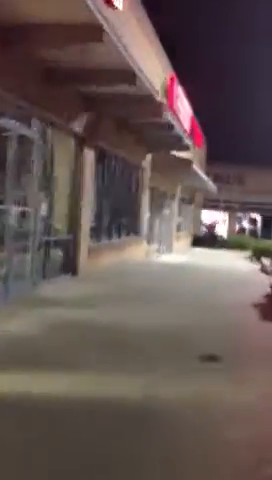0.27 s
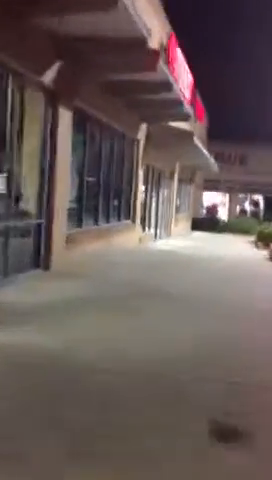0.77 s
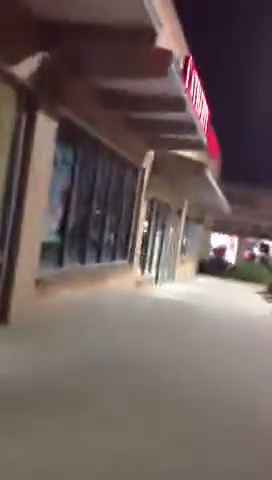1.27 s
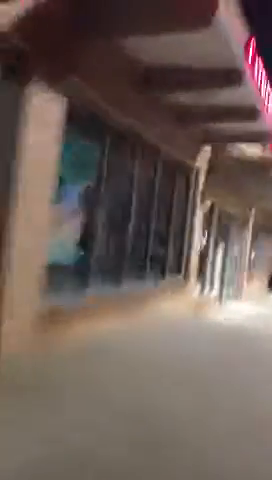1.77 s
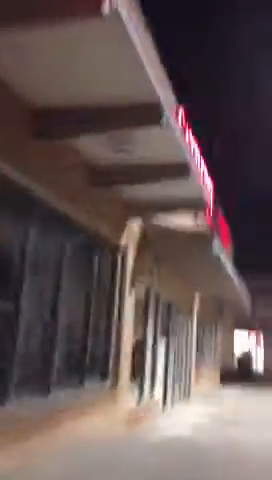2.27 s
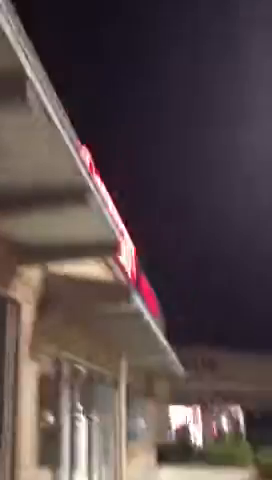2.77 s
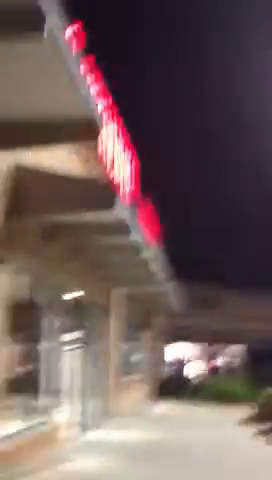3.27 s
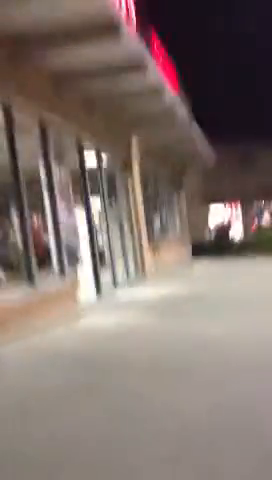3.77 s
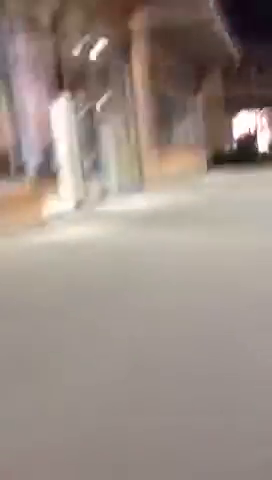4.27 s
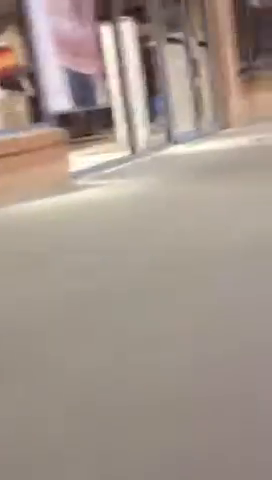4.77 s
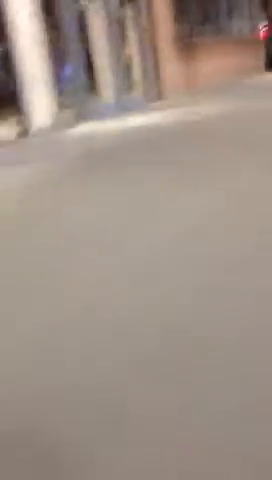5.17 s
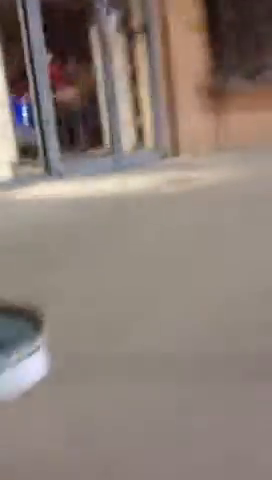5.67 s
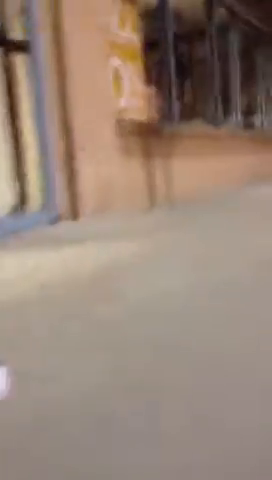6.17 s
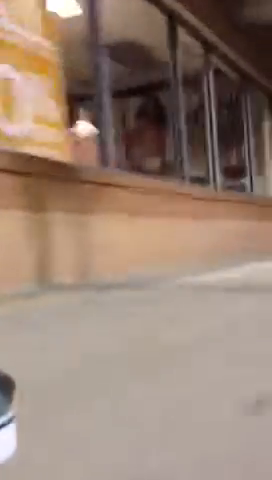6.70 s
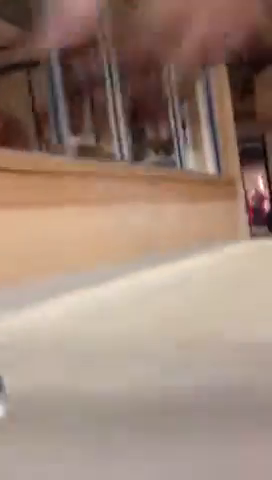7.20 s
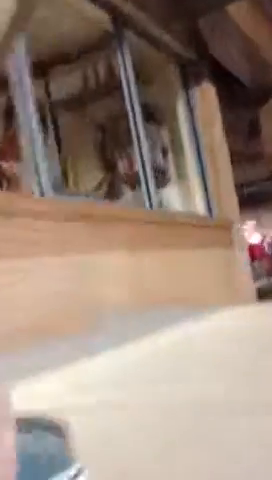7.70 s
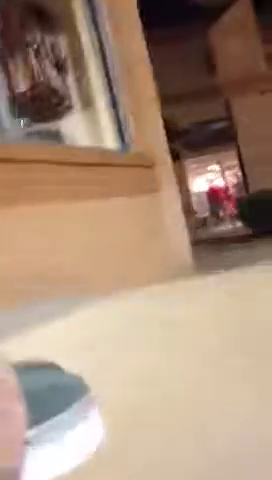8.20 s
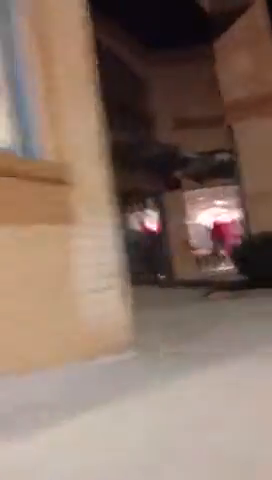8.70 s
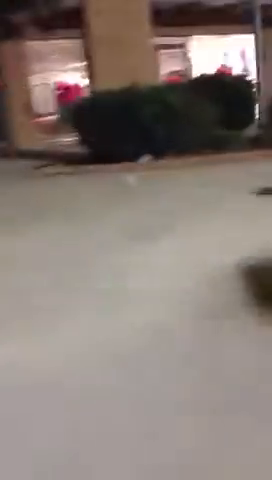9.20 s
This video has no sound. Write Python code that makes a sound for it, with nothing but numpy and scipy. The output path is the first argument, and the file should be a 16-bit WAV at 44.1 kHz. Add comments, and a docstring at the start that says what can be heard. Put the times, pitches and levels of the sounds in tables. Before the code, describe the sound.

A skateboard rolls over a concrete sidewalk for about nine and a half seconds, heard close from a microphone in the rider's hand. The wooden deck gives a continuous, resonant rumble. At each slab joint the front and rear wheels make a loud double clack, briefly echoed by an awning; the rumble dips after each and swells back. Pairs come at the start and around 0.5, 1.1, 1.7, 2.4 and 3.5 seconds, with small ticks of grit and a very faint swish near 2.5 seconds. From about 4 to 7 seconds the sound turns brighter, with rasping, hissing wheels and sharper clacks near 4.4, 5.1, 5.8 and 6.6 seconds. A grain cracks sharply around 4.5 seconds, and the rumble briefly eases. The hiss then recedes, and the duller roll continues with strong double clacks at about 7.3, 8.1 and 8.7 seconds.

```python
"""A skateboard rolls along a concrete sidewalk under a shop awning, heard from a phone in the rider's hand.
Rough slabs force the deck into a resonant rumble and make the wheels hiss. At each joint the front axle
clacks, then the rear, and the awning reverberates; grit cracks, and a faint swish passes as the phone
is lifted. Midway the rider crouches and for a while the microphone faces the wheels, so the sound
brightens. The phone's limiter ducks the rumble after each clack and lets it swell back."""
import sys
import numpy as np
from scipy import signal
from scipy.fft import rfft, irfft, next_fast_len
from scipy.io import wavfile
from scipy.ndimage import uniform_filter1d, minimum_filter1d, map_coordinates

SR = 44100
rng = np.random.default_rng(int(sys.argv[2]) if len(sys.argv) > 2 else 0)


def output_pcm(signal):
    """Save a mono or channel-first signal as 16-bit PCM at the path in sys.argv[1].

    Samples are clipped to [-1, 1] before scaling.
    """
    pcm = np.clip(np.atleast_2d(signal).T, -1, 1) * 32767
    wavfile.write(sys.argv[1], SR, np.round(pcm).astype(np.int16))


N = 416744

# Shaking of the board by the pavement, about its average [t/s, level/dB]
SHAKING = [(0.15, 1), (0.95, 1.5), (1.55, 3), (2.62, 4), (3.03, -3), (3.45, 0.5), (3.9, -1), (4.25, -3.5),
           (4.78, -8.5), (5.05, -2.5), (5.65, 1.5), (6.05, -1), (6.3, 3.5), (6.55, -0.8), (7.85, -1.5),
           (8.4, 0.5), (9.05, 2), (9.42, .5)]
# Aim: treble gained as the microphone turns to face the wheels [t/s, level/dB]
MIC_AIM = [(3.4, 2), (3.9, 9), (4.2, 14.5), (5.0, 17), (5.8, 19), (6.4, 17), (7.1, 8.5), (7.6, 1),
           (8.4, -0.5)]
# Coarse patches that make the deck sing [t/s, half length/s, hum gain/dB, body gain/dB]
COARSE_PATCHES = [(1.098, 0.037, 4, 5), (5.098, .08, 5, 3.5), (5.8, 0.039, 6, 0), (6.26, 0.022, 10.5, -2),
                  (6.553, .04, -1, 2), (9.416, .045, 11.5, -9)]
# Further modes of deck, trucks and wheels [f/Hz, bandwidth/Hz, level/dB]
BOARD_MODES = [(205.6, 24, -7.5), (768, 48, -12.5), (969, 46, -11), (1403, 50, -11.5), (1832, 38, -4.5),
               (2340, 130, -10.5), (2830, 150, -12), (4740, 240, -17)]
# Rolling spectra, low to high: three of the deck, three of the wheels [f/Hz, relative level/dB]
RUMBLE_SPECTRUM = [(25, -57), (60, -34.5), (100, -20), (135, -12), (170, -3.5), (210, -1), (270, -0.5),
                   (350, -1.5), (420, -8), (520, -21), (900, -70)]
BODY_SPECTRUM = [(200, -66), (400, -22), (480, -4.5), (560, -3.5), (650, -3), (700, -2.5), (770, -2),
                 (860, -6), (1000, -29), (1600, -71)]
GROWL_SPECTRUM = [(400, -74), (780, -11.5), (880, -2), (960, 1.5), (1020, -3), (1110, 0), (1260, -13.5),
                  (1800, -23), (3200, -77)]
RASP_SPECTRUM = [(600, -58), (1230, 0.5), (1390, 1.5), (1560, 0.5), (1780, -3), (2020, -8.5), (2350, -9.5),
                 (2900, -14), (3400, -17), (4100, -23.5), (5400, -43), (15000, -45)]
WHIRR_SPECTRUM = [(2000, -43), (3700, -8), (4300, -3.5), (4650, 0), (4900, -5.5), (5250, -12.5),
                  (6300, -12), (8000, -16), (10000, -21.5), (11500, -15), (13300, -13.5), (15300, -19.5)]
HISS_SPECTRUM = [(2500, -61), (5300, -4.5), (6300, 0), (8200, -1.5), (9200, -6), (10000, -11.5),
                 (13000, -11), (15300, -15)]
# Balance of the rolling sounds [standing level/dB, crouch gain/dB, dB per dB of shaking, dB per dB of aim]
RUMBLE_LEVELS = (-0.76, -0.5, 1.01, -0.012)
HUM_LEVELS = (-5, 5, 0.94, 0)
BODY_LEVELS = (0.26, 0.016, 0.82, 0.052)
GROWL_LEVELS = (-8, 7.5, 0.85, -0.07)
RASP_LEVELS = (-20, 5, 0.88, 0.5252)
WHIRR_LEVELS = (-36, 5.5, .7, 1.1459)
HISS_LEVELS = (-31.5, -7, 0.75, 1.0431)
# Joint crossings; a pair is front axle, rear axle [t/s pair, peak level/dB over CEILING pair,
# lag between left and right wheel/ms, bite into the edge/dB pair, clink f/Hz pair]
JOINT_CROSSINGS = [(0.0117, 0.122, 3.5, 4, 5, 2.5, -3, 1750, 1800),
                   (0.5373, 0.653, 2.5, 1, 4.6, 2.5, -4.5, 1810, 2360),
                   (1.1254, 1.2457, 3.5, 4.5, 3.35, -5, -1, 1270, 1280),
                   (1.7473, 1.8712, 7.5, 6.5, 3.4, 0, -4.5, 1610, 1390),
                   (2.3635, 2.4904, 6, 6, 3.45, 4.5, 2.5, 1550, 2300),
                   (3.502, 3.6412, 6.5, 8, 2.7, 0, -13, 1260, 1240),
                   (4.36, 4.514, -1, 4, 3.36, 3.5, 3, 1690, 1460),
                   (5.1361, 5.2582, 2.5, 10.5, 1.46, 15, 0, 2830, 4750),
                   (5.831, 5.9453, 7.5, 10.5, 3.8, 6, -0.5, 2820, 4360),
                   (6.602, 6.7282, 4.5, 4.5, 3.2, 9.5, 7, 1410, 3160),
                   (7.301, 7.428, 7.5, 6.5, 3.74, 12.5, 5.5, 1490, 2240),
                   (8.06, 8.19, 8, 7, 3.47, 3, 2.5, 1280, 1270),
                   (8.6917, 8.831, 10, 10.5, 8.7, 1, -2.5, 1430, 1240)]
# Spectra of a clack's parts and of the awning's echo [f/Hz, relative level/dB]
KNOCK_SPECTRUM = [(60, -55), (250, -9.5), (420, -10.5), (550, -0.5), (660, -2), (850, -2.5), (1050, -5),
                  (1300, -19.5), (2200, -34.5), (5000, -79), (16000, -94)]
THUMP_SPECTRUM = [(25, -38), (70, -27.5), (130, -12), (185, 0.5), (260, 1.5), (340, 1.5), (420, -11),
                  (520, -10.5), (1000, -81)]
CRACK_SPECTRUM = [(100, -44.5), (800, -1), (1350, 8), (1750, 2), (2100, -5.5), (2800, -6.5), (3300, -11),
                  (5000, -40.5), (16000, -71)]
SNAP_SPECTRUM = [(200, -49), (2400, 3), (3500, 1), (4500, 4), (5400, -15), (6300, -7), (8300, -11),
                 (10200, -24.5), (13300, -12), (15500, -13.5)]
ECHO_SPECTRUM = [(150, -24), (600, 11.5), (1800, 6.5), (3500, -9.5), (8000, -13.5), (10000, -23.5),
                 (15000, -23)]
# Reverberation time under the awning [f/Hz, T60/s]
AWNING_T60 = [(150, 0.17), (1000, 0.16), (4000, 0.18), (12000, 0.18)]
# Grains under a wheel [t/s, tick peak level/dB, f/Hz, thud peak level/dB]
GRAINS = [(1.5453, -32, 3800, -39), (1.553, -34, 1200, -13), (2.205, -26.5, 1900, -13),
          (2.31, -27.5, 1950, -20), (2.712, -23, 1780, -25), (2.927, -39, 1200, -19),
          (4.4585, -9, 6200, -24), (4.608, -28, 3900, -28), (4.845, -33, 1800, -28)]
# Spectrum of the swish of the lifted phone [f/Hz, relative level/dB]
SWISH_SPECTRUM = [(4000, -39), (7300, 0), (8300, 3), (9000, -3), (9800, -17), (15000, -28)]

BENDING_MODE, FLEX_MODE = (555.4, 26), (339.5, 45)  # main and lower deck mode [f/Hz, bandwidth/Hz]
CROUCH_S = (3.4, 6.26)  # the rider starts to crouch and is fully down
ROLL_DB, CEILING = -29, 0.7  # reference level of the roll; limiter threshold as an amplitude


def amp(db):
    """Amplitude ratio of a level in decibels."""
    return 10 ** (np.asarray(db) / 20)


def unit(x):
    """Normalisation to rms 1."""
    return x / np.sqrt(np.mean(x ** 2) + 1e-20)


def at_frequency(points, hz):
    """Interpolation of (f/Hz, value) points on a logarithmic frequency axis."""
    f, values = np.transpose(points)
    return np.interp(np.log(hz + 1), np.log(f + 1), values)


def wobble(rate_hz):
    """Slow random modulation: a spline through rate_hz Gaussian knots a second."""
    knots = rng.standard_normal(int(N * rate_hz / SR) + 4)
    return map_coordinates(knots, [np.arange(N) * rate_hz / SR])


def colour(x, spectrum):
    """Minimum-phase filtering: x takes on the spectrum causally, by way of a folded cepstrum; rms 1."""
    size = 2 * next_fast_len(len(x))
    gain = amp(at_frequency(spectrum, np.fft.rfftfreq(size, 1 / SR)))
    cepstrum = irfft(np.log(gain))
    cepstrum[1:size // 2] *= 2
    cepstrum[size // 2 + 1:] = 0
    return unit(irfft(rfft(x, size) * np.exp(rfft(cepstrum)), size)[:len(x)])


def resonance(x, hz, width_hz):
    """Forced response of one damped mode, with gain 1 at its peak."""
    return signal.lfilter(*signal.iirpeak(hz, hz / width_hz, fs=SR), x)


def ring(x, mode):
    """Resonance of one (f/Hz, bandwidth/Hz) mode driven by x; rms 1."""
    return unit(resonance(x, *mode))


def board(x, scatter_db=0):
    """Modal superposition: the board's modes add to x, their levels spread by scatter_db; rms 1."""
    modes = BOARD_MODES + scatter_db * rng.standard_normal((len(BOARD_MODES), 1)) * [0, 0, 1]
    return unit(x + sum(amp(db) * resonance(x, hz, width_hz) for hz, width_hz, db in modes))


def roughness(spectrum, depth_db, rate_hz):
    """Amplitude modulation: a noisy contact force swells at each little bump, then is filtered; rms 1."""
    return colour(rng.standard_normal(N) * amp(depth_db * wobble(rate_hz)), spectrum)


def rolling_db(levels):
    """Gains add in decibels: a rolling sound follows the shaking, the crouch and the microphone's aim."""
    standing_db, crouch_db, per_shake, per_aim = levels
    t = np.arange(N) / SR
    crouch = np.interp(t, CROUCH_S, [0, 1])
    shake_db = np.interp(t, *np.transpose(SHAKING))
    aim_db = np.interp(t, *np.transpose(MIC_AIM))
    return ROLL_DB + standing_db + crouch_db * crouch + per_shake * shake_db + per_aim * aim_db


def deck():
    """Forced vibration: the roughness of the slabs drives the resonances of the wooden deck."""
    t = np.arange(N) / SR
    rumble_db, hum_db, body_db = map(rolling_db, (RUMBLE_LEVELS, HUM_LEVELS, BODY_LEVELS))
    for at_s, half_s, hum_gain_db, body_gain_db in COARSE_PATCHES:
        swell = np.exp(-((t - at_s) / half_s) ** 2)
        hum_db += hum_gain_db * swell
        body_db += body_gain_db * swell
    rumble = amp(rumble_db) * board(roughness(RUMBLE_SPECTRUM, depth_db=0.9, rate_hz=70))
    # the flex mode grows as the square of the rumble's amplitude
    flex = amp(2 * rumble_db + 21) * ring(roughness(RUMBLE_SPECTRUM, depth_db=0.5, rate_hz=27), FLEX_MODE)
    hum = amp(hum_db) * ring(roughness(BODY_SPECTRUM, depth_db=2, rate_hz=20), BENDING_MODE)
    body = amp(body_db) * board(roughness(BODY_SPECTRUM, depth_db=0.5, rate_hz=120))
    growl = amp(rolling_db(GROWL_LEVELS)) * board(roughness(GROWL_SPECTRUM, depth_db=1.2, rate_hz=200))
    return rumble + flex + hum + body + growl


def wheels():
    """Rolling contact noise: sand rasps under the urethane, the bearings whirr, a fine hiss spreads."""
    rasp = amp(rolling_db(RASP_LEVELS)) * board(roughness(RASP_SPECTRUM, depth_db=1.3, rate_hz=350))
    whirr = amp(rolling_db(WHIRR_LEVELS)) * board(roughness(WHIRR_SPECTRUM, depth_db=1.7, rate_hz=700))
    hiss = amp(rolling_db(HISS_LEVELS)) * roughness(HISS_SPECTRUM, depth_db=1.3, rate_hz=780)
    return rasp + whirr + hiss


def off_axis(spectrum, aim_db, corner_hz=4500):
    """Directivity: a microphone turned away loses the top of the spectrum."""
    db_per_octave = 11 * max(0.5 - aim_db / 15, 0)
    return [(hz, db - db_per_octave * max(np.log2(hz / corner_hz), 0)) for hz, db in spectrum]


def axle_impact(t, lag_ms, bite_db, aim_db, clink_hz, thump_db):
    """Impact excitation: an axle's two wheels strike the joint in turn and scrape over its edge."""
    blows = np.zeros(len(t))
    blows[0] = 1
    blows[round(abs(lag_ms) * SR / 1000)] += 0.6
    chatter = 0.074 * rng.standard_normal((2, len(t))) * amp(-60 * t / 0.03)
    knock = board(colour(blows + chatter[0], KNOCK_SPECTRUM), scatter_db=7.5)
    knock = knock + amp(-10) * ring(knock, BENDING_MODE)
    thump = amp(thump_db) * colour(blows + chatter[1], THUMP_SPECTRUM)
    # the treble builds as the soft wheel presses into the edge
    press = (1 - np.exp(-t / 0.00077)) * amp(-60 * t / 0.019)
    scrape = rng.standard_normal((2, len(t))) * signal.fftconvolve(blows, press)[:len(t)]
    # a hard bite and a microphone facing the wheels both brighten the woody knock
    crack_db = -12 + 0.65 * bite_db + 0.2 * aim_db
    snap_db = -34 + bite_db + 1.08 * aim_db
    crack = amp(crack_db) * board(colour(blows + 0.17 * scrape[0], CRACK_SPECTRUM), scatter_db=9.5)
    snap = amp(snap_db) * board(colour(scrape[1], off_axis(SNAP_SPECTRUM, aim_db)), scatter_db=4.5)
    # the point of contact decides which pitch of the truck clinks most
    clink = amp(crack_db - 5) * ring(scrape[0], (clink_hz, 260))
    hit = knock + thump + crack + snap + clink
    return np.tanh(0.5 * hit / np.abs(hit).max())  # the rubber bushings soften the hardest swings


def clacks(front_thump_db=-3.5, rear_thump_db=-9, echo_db=-17, echo_fade_db_per_s=1.65):
    """Direct plus reflected sound: each axle hits each joint; the echo weakens along the way."""
    out, t = np.zeros(N + SR), np.arange(SR // 5) / SR
    for joint in JOINT_CROSSINGS:
        front_s, rear_s, front_db, rear_db, lag_ms, front_bite, rear_bite, front_hz, rear_hz = joint
        front = front_s, front_db, front_bite, front_hz, front_thump_db
        rear = rear_s, rear_db, rear_bite, rear_hz, rear_thump_db
        for at_s, over_db, bite_db, clink_hz, thump_db in (front, rear):
            aim_db = np.interp(at_s, *np.transpose(MIC_AIM))
            hit = axle_impact(t, lag_ms, bite_db, aim_db, clink_hz, thump_db)
            hit = hit + amp(echo_db - echo_fade_db_per_s * at_s) * hit.std() * awning(t)
            out[round(at_s * SR):][:len(t)] += CEILING * amp(over_db) * hit / np.abs(hit).max()
    return out[:N]


def awning(t, delay_s=0.0094, rise_s=0.0027):
    """Reverberation: diffuse reflections from roof and shop fronts decay exponentially; rms 1."""
    noise = colour(rng.standard_normal(len(t)), ECHO_SPECTRUM)
    hz, age_s, bands = signal.stft(noise, SR, nperseg=256)
    decay = amp(-60 * age_s / at_frequency(AWNING_T60, hz)[:, None])
    tail = signal.istft(bands * decay, SR, nperseg=256)[1][:len(t)]
    build_up = 1 - np.exp(-np.maximum(t - delay_s, 0) / rise_s)
    return unit(tail * build_up)


def grit(tick_t60_s=0.011, echo_t60_s=0.16, thud_t60_s=0.015):
    """Fracture transients: single grains crack under a wheel, and the larger ones jolt the deck."""
    out, t = np.zeros(N + SR), np.arange(SR // 5) / SR
    for at_s, tick_db, hz, thud_db in GRAINS:
        noise = rng.standard_normal((3, len(t)))
        burst = unit(noise[0] * amp(-60 * t / tick_t60_s))
        echo = unit(noise[1] * t * amp(-60 * t / echo_t60_s))
        tick = ring(burst, (hz, 0.2 * hz)) + 0.18 * burst + amp(-19) * echo
        thud = colour(noise[2] * amp(-60 * t / thud_t60_s), RUMBLE_SPECTRUM)
        for part, peak_db in ((tick, tick_db), (thud, thud_db)):
            out[round(at_s * SR):][:len(t)] += amp(peak_db) * part / np.abs(part).max()
    return out[:N]


def swish(middle_s=2.55, hold_s=0.37, level_db=-52, fade_db_per_s=140):
    """Band-limited noise: a thin swish rises, holds and fades as the phone is lifted."""
    outside_s = np.maximum(np.abs(np.arange(N) / SR - middle_s) - hold_s / 2, 0)
    envelope = amp(level_db - fade_db_per_s * outside_s)
    return envelope * roughness(SWISH_SPECTRUM, depth_db=1.5, rate_hz=42)


def scene():
    """Superposition: the roll, modulated by rougher and smoother spots, adds to clacks, grit and swish."""
    ride = amp(1.34 * wobble(rate_hz=22)) * (deck() + wheels()) + clacks() + grit() + swish()
    bass = signal.sosfiltfilt(signal.butter(4, 135, fs=SR, output="sos"), ride)
    bass_cut = np.interp(np.arange(N) / SR, [0.9, 1.2], [0.7, 0])  # the deep bass is weak for a second
    return (ride - bass_cut * bass)[None]


def limiter(x, hold_s=0.077, release_db_per_s=18):
    """Peak limiting: a peak over the ceiling pulls the gain down; it waits, then climbs back steadily."""
    over_db = 20 * np.log10(np.maximum(np.abs(x) / CEILING, 1))
    span = int(hold_s * SR) | 1
    held_db = -minimum_filter1d(-over_db, span, origin=span // 2, mode="constant")
    release_db = release_db_per_s * np.arange(N) / SR
    cut_db = np.maximum.accumulate(held_db + release_db) - release_db
    look_ahead = SR // 700  # the gain ramps down just before the peak
    return x * amp(uniform_filter1d(minimum_filter1d(-cut_db, look_ahead), look_ahead))


def record(dry, top_hz=15400):
    """Band limiting: the phone limits the peaks, then keeps nothing above top_hz."""
    size = next_fast_len(N + SR // 2)
    passband = np.fft.rfftfreq(size, 1 / SR) < top_hz
    return irfft(rfft(limiter(dry[0]), size) * passband, size)[None, :N]


dry = scene()
out = record(dry)
output_pcm(out)
```